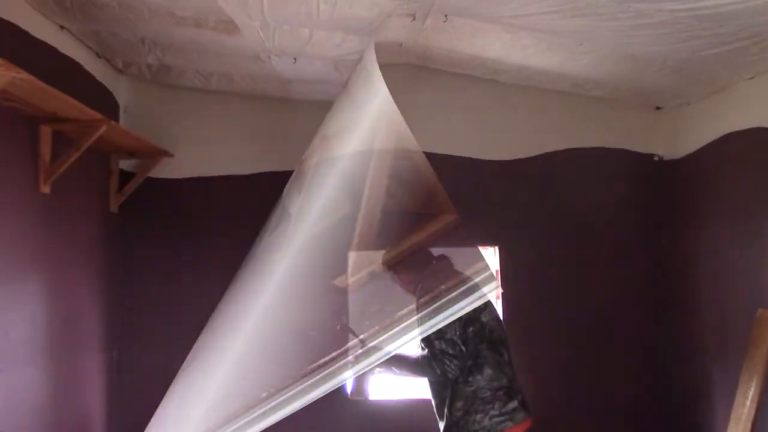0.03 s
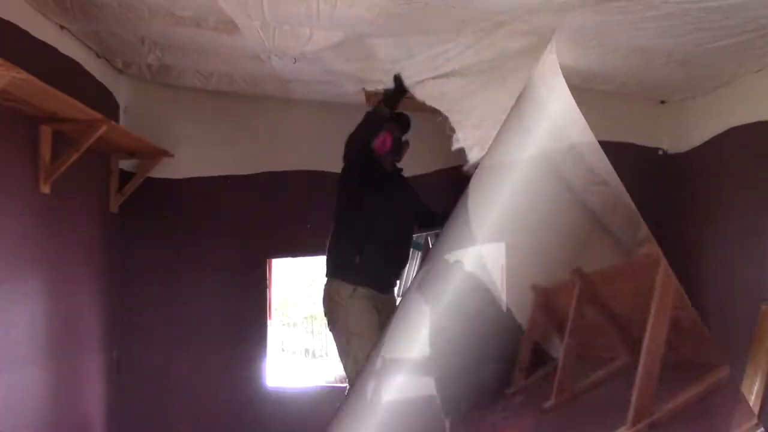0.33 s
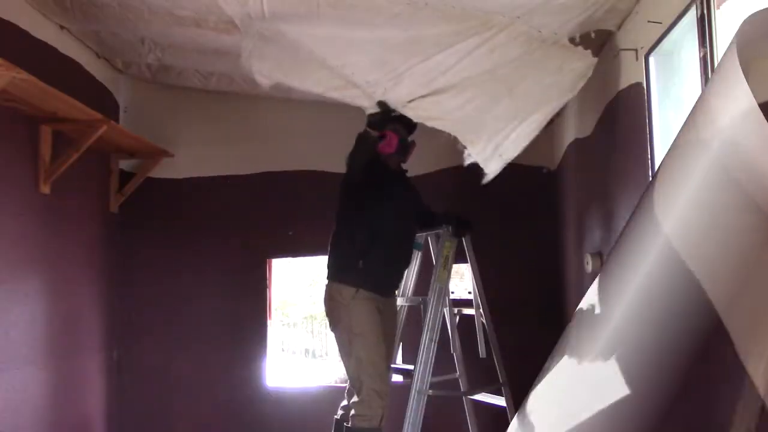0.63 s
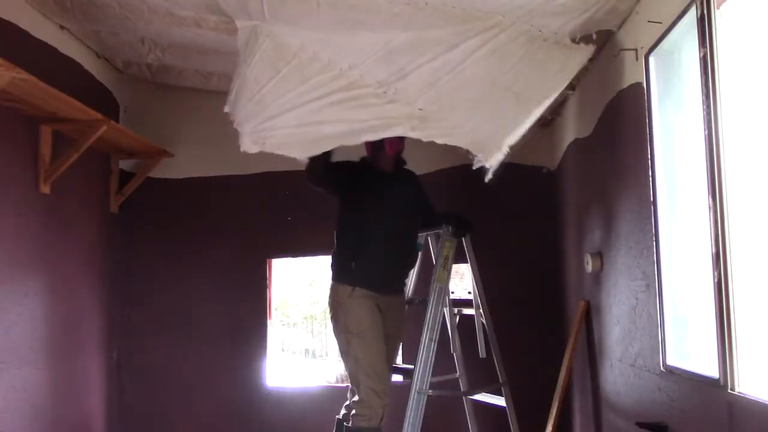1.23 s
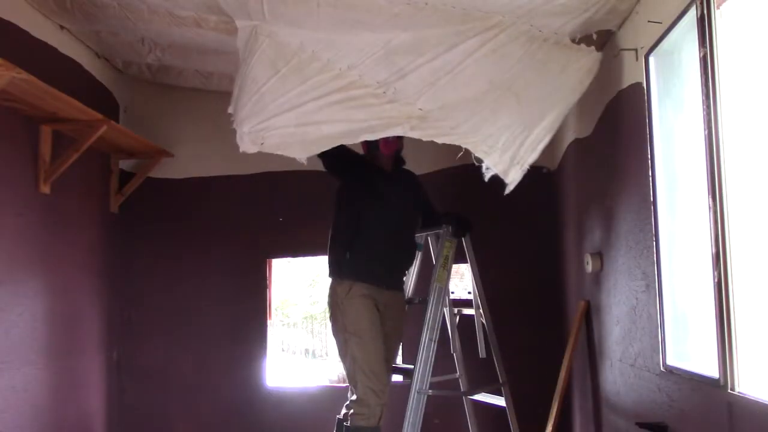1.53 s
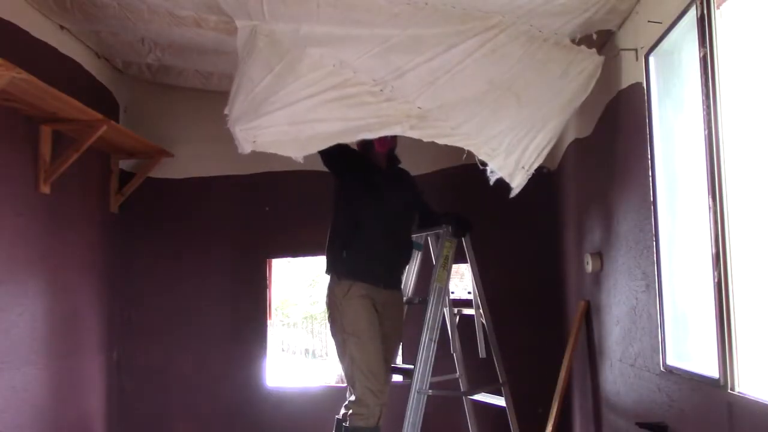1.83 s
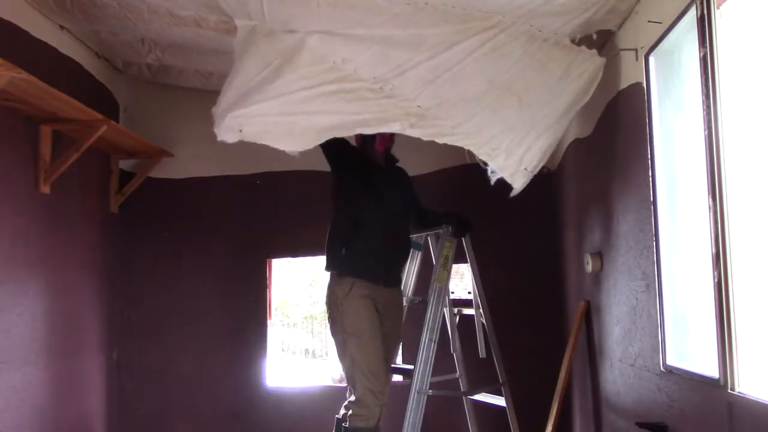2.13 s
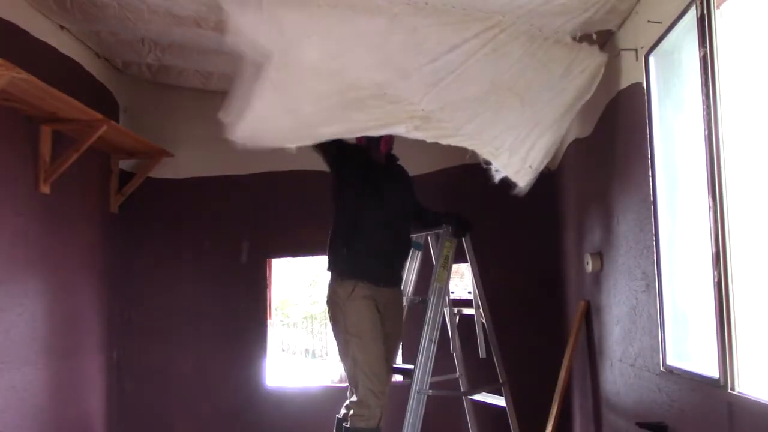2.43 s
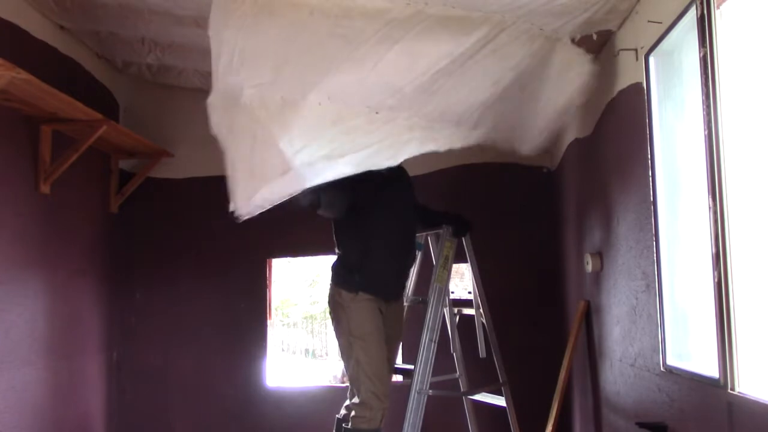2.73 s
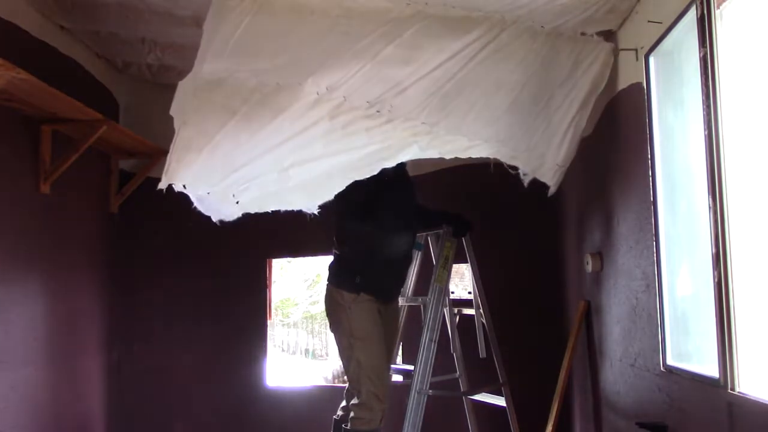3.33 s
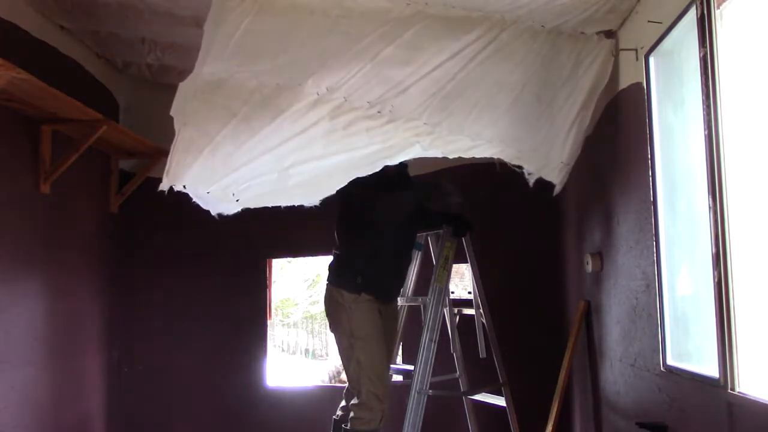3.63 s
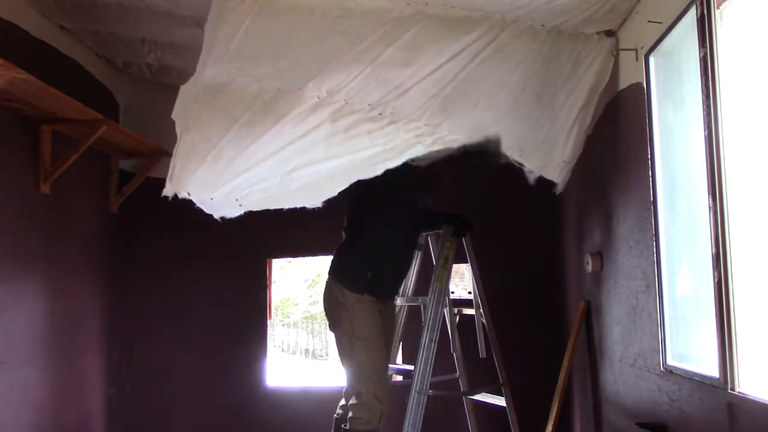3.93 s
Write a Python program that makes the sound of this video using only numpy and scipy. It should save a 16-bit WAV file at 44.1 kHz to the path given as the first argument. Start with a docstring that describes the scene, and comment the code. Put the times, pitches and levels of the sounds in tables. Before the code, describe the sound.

Crackling and short rips of a big stapled sheet being torn down indoors.

```python
"""Crackling and short rips: a large stapled sheet is being pulled off the ceiling of a bare room.
Creases buckle, fibres snap and the sheet pops off its staples. In one fast tear the threads snap
so evenly that they screech, while the taut part groans and the loose part flutters.
The worker knocks dully on the stepladder and scuffs once, over a faint steady whirr.
All is heard in mono from a few metres away."""
import sys
import numpy as np
from scipy import signal
from scipy.fft import rfft, irfft
from scipy.io import wavfile

SR = 44100
rng = np.random.default_rng(int(sys.argv[2]) if len(sys.argv) > 2 else 0)


def log_audio(samples):
    """Write samples as a 16-bit WAV file to the path given in sys.argv[1]."""
    # one column per channel
    frames = np.atleast_2d(samples).T
    # limit to full scale, then quantise
    limited = np.clip(frames, -1, 1)
    pcm = np.round(limited * 32767).astype(np.int16)
    wavfile.write(sys.argv[1], SR, pcm)


N = 176400
T = np.arange(N) / SR


def from_db(db):
    """Decibels to gain."""
    return 10 ** (np.asarray(db) / 20)


def unit_rms(x):
    """Scale to an rms of 1."""
    return x / np.sqrt(np.mean(x ** 2) + 1e-20)


def at_hz(points, hz):
    """Read a curve on a log-frequency axis."""
    freqs, values = np.transpose(points)
    return np.interp(np.log(hz + 1e-3), np.log(freqs), values)


def fader(times, db):
    """Gain riding a dB curve, silent outside it."""
    return from_db(np.interp(T, times, db, left=-120, right=-120))


def decay(start, decay_s):
    """Envelope with a hard attack and an exponential tail."""
    return (T >= start) * np.exp(-np.clip((T - start) / decay_s, 0, 20))


def filtered(x, kind, hz, order=2):
    """Butterworth low-pass or high-pass."""
    return signal.sosfilt(signal.butter(order, hz, kind, fs=SR, output="sos"), x + 1e-18)


def coloured(x, eq):
    """Apply an EQ curve at minimum phase, so clicks keep their attack; the result has an rms of 1."""
    gain = from_db(at_hz(eq, np.fft.rfftfreq(N, 1 / SR)))
    cepstrum = irfft(np.log(gain), N)
    cepstrum[1:N // 2] *= 2
    cepstrum[N // 2 + 1:] = 0
    return unit_rms(irfft(rfft(x) * np.exp(rfft(cepstrum)), N))


def drift(rate_hz):
    """Smooth random wander with an rms of 1."""
    return unit_rms(filtered(rng.standard_normal(N), "low", rate_hz))


def clicks(per_s, spread_db, rows=1):
    """Rows of random clicks of uneven size."""
    sizes = from_db(spread_db * np.minimum(rng.exponential(1, (rows, N)), 4))
    return sizes * rng.choice([-1, 1], (rows, N)) * (rng.random((rows, N)) < per_s / SR)


def ring(x, hz, t60):
    """Resonator: a unit click sets a sine of height 1 ringing."""
    radius, angle = from_db(-60 / (t60 * SR)), 2 * np.pi * hz / SR
    return signal.lfilter([0, np.sin(angle)], [1, -2 * radius * np.cos(angle), radius ** 2], x + 1e-18)


# Reverb time of the bare room (frequency [Hz], T60 [s])
REVERB_TIMES = [(100, 0.48), (1500, 0.52), (4000, 0.21), (8000, 0.36), (16000, 0.22)]


def room(places, direct_share=0.5, predelay_s=0.0024):
    """Each row is a place in the room with its own dense tail, which dies sooner in the treble."""
    places = np.atleast_2d(places)
    t, hz = T[:SR // 2], np.fft.rfftfreq(SR // 2, 1 / SR)
    white = rfft(rng.standard_normal((len(places), len(t))))
    band_edges = np.linspace(0, np.sqrt(SR / 2), num=10) ** 2
    tail = 0
    for low, high in zip(band_edges, band_edges[1:]):
        band = irfft(white * (hz >= low) * (hz < high), len(t))
        fade = from_db(-60 * t / at_hz(REVERB_TIMES, (low + high) / 2)) * (t > predelay_s)
        tail += band * fade / np.linalg.norm(fade)
    wet = signal.fftconvolve(places, tail, axes=1)[:, :N]
    heard = np.sqrt(direct_share) * places + np.sqrt(1 - direct_share) * wet
    return heard.sum(axis=0) / np.sqrt(len(places))


# Airy EQ of the background bed (frequency [Hz], level [dB])
WHIRR_EQ = [(35, -70), (60, -31), (745, 0), (1100, 3.5), (1340, -2.5), (3020, -6.5), (3320, -14),
            (11400, -28), (15800, -32)]
# Faint pitches in the bed (frequency [Hz], width [Hz], level [dB])
WHIRR_RESONANCES = [(896, 44, -63.5), (3020, 62, -58)]


def whirr():
    """A steady bed of airy noise with two narrow resonances."""
    bed = from_db(-47.5) * coloured(rng.standard_normal(N), WHIRR_EQ)
    for hz, width_hz, db in WHIRR_RESONANCES:
        t60 = np.log(1000) / (np.pi * width_hz)
        bed += from_db(db) * unit_rms(ring(rng.standard_normal(N), hz, t60))
    return bed


# Mid-heavy EQ of the rub (frequency [Hz], level [dB])
SCUFF_EQ = [(200, -34), (600, 6), (2200, 2), (5000, -11), (12000, -43)]


def scuff():
    """One short, dull, grainy rub as the worker shifts."""
    grit = coloured(clicks(per_s=3200, spread_db=2.4), SCUFF_EQ)
    return from_db(-32) * decay(start=3.662, decay_s=0.059) * grit


# Knock cues; a lower cut-off is a softer hit (time [s], strength [dB], cut-off [Hz])
KNOCKS = [(0.01, -28.5, 930), (0.094, -36, 300), (1.781, -35, 500), (3.206, -21, 470), (3.229, -33, 700),
          (3.249, -43, 800), (3.78, -48, 900)]
# Boxy EQ of the thud (frequency [Hz], level [dB])
THUD_EQ = [(50, -47), (120, -32), (180, -19), (250, 2), (550, -2.5), (800, -6.5), (2000, -34), (8000, -73)]
# Low ringing modes that each knock sets off (frequency [Hz], relative level [dB], T60 [s])
KNOCK_MODES = [(239, -1, 0.18), (255, 1.5, 0.16), (318, -5, 0.27), (385, -3, 0.26), (522, 0, 0.33),
               (574, 1, 0.26)]


def ladder_thumps(thud_trim_db=5.5, ring_trim_db=-2):
    """Each soft knock makes a short thud for the room to answer and sets low modes ringing."""
    push, thud = np.zeros((2, N))
    noise = coloured(rng.standard_normal(N), THUD_EQ)
    for start, db, cutoff_hz in KNOCKS:
        impulse = from_db(db) * (np.arange(N) == int(start * SR))
        burst = from_db(db + thud_trim_db) * noise * decay(start, decay_s=0.016)
        push += filtered(impulse, "low", cutoff_hz)
        thud += filtered(burst, "low", cutoff_hz)
    modes_ringing = sum(from_db(db + ring_trim_db) * ring(push, hz, t60) for hz, db, t60 in KNOCK_MODES)
    return filtered(room(thud) + modes_ringing, "high", hz=218, order=4)


# Fader ride of the flapping (time [s], level [dB])
FLUTTER_RIDE = [(1.765, -55), (1.795, -17.5), (1.825, -21.5), (1.86, -26), (1.92, -64), (2.499, -47),
                (2.59, -21.5), (2.635, -29.5), (2.68, -24.5), (2.759, -25.5), (2.839, -21.5), (2.9, -57),
                (3.17, -29.5)]
# Muffled EQ of the flaps (frequency [Hz], level [dB])
FLUTTER_EQ = [(60, -33), (150, -18), (230, -3), (400, 4), (1000, -4.5), (1650, -1.5), (3500, -49)]


def flutter():
    """The freed sheet drums with quick, dull flaps."""
    flaps = coloured(clicks(per_s=400, spread_db=2.7), FLUTTER_EQ)
    return fader(*np.transpose(FLUTTER_RIDE)) * flaps


# Groan cues under the fast tear (centre time [s], half length [s], pitch [Hz], level [dB])
GROAN_CUES = [(2.593, .018, 769, -26.5), (2.689, 0.017, 740, -22), (2.738, 0.023, 597, -30),
              (2.753, .045, 407, -24.5), (2.8, .1, 229.7, -34.5)]


def groans(sag_per_s=0.35, wobble=0.016, flicker_db=1):
    """The taut sheet gives short, rough tones that swell and sag in pitch as the tension lets go."""
    out = 0
    for centre, half_length, hz, db in GROAN_CUES:
        since = np.clip(T - centre, -half_length, half_length)
        pitch = hz * (1 - sag_per_s * since + wobble * drift(110))
        tone = np.sin(2 * np.pi * np.cumsum(pitch) / SR)
        flicker = from_db(flicker_db * drift(90))
        swell = np.cos(np.pi / 2 * since / half_length)
        out += from_db(db) * swell * unit_rms(tone * flicker)
    return out


# Pitch and fader ride of the screech (time [s], thread snap rate [Hz], level [dB])
SCREECH_RIDE = [(2.53, 5500, -22), (2.57, 5400, -19), (2.666, 5250, -21.5), (2.679, 5170, -14.5),
                (2.733, 5260, -13), (2.78, 5130, -16.5), (2.84, 5200, -16), (2.877, 5190, -25.5),
                (2.895, 5170, -35)]


def fast_tear(jitter=0.028, rough_db=4.5, weave_hz=798, weave_depth=0.52):
    """Threads snap one after another at a nearly even rate, which makes a rough screech."""
    times, snap_hz, db = np.transpose(SCREECH_RIDE)
    speed = 1 + jitter * drift(178)
    phase = 2 * np.pi * np.cumsum(np.interp(T, times, snap_hz) * speed) / SR
    tone = np.sin(phase) + from_db(-14) * np.sin(1.93 * phase)  # upper partial just under the octave
    # The weave repeats every few threads and beats in the tear, adding side tones.
    weave = 1 + weave_depth * np.sin(2 * np.pi * weave_hz * np.cumsum(speed) / SR)
    roughness = from_db(rough_db * drift(370))
    return fader(times, db) * unit_rms(tone * weave * roughness)


# Staple pop cues (time [s], level [dB])
POP_CUES = [(1.091, -16), (1.72, -19), (1.865, -23), (1.936, -29), (1.97, -17), (2.084, -17.5),
            (2.333, -15.5), (2.411, -26), (2.897, -14), (2.941, -13.5), (3.007, -15.5), (3.46, -48),
            (3.937, -13.5)]
# Bright EQ of the sheet giving way, for pops and rips alike (frequency [Hz], level [dB])
RIP_EQ = [(30, -16.5), (70, -31), (140, -26), (400, -9), (1500, -12), (4500, 3.5), (7500, 3.5),
          (10500, 4.5), (13000, -2), (16000, -19)]
CRISP_LOW_CUT_HZ = 6600


def staple_pops():
    """The sheet tears off each staple with a few milliseconds of very bright noise."""
    noise = coloured(rng.standard_normal(N), RIP_EQ)
    crisp = unit_rms(filtered(noise, "high", CRISP_LOW_CUT_HZ))
    return crisp * sum(from_db(db) * decay(start, decay_s=0.0039) for start, db in POP_CUES)


# Fader rides of the crackle over three pulls, before trim (time [s], body [dB], treble [dB])
PULL_RIDE = [(0, -16.5, -22), (0.22, -18.5, -21.5), (0.43, -20, -18), (0.56, -17, -20), (0.72, -18, -18),
             (0.9, -13.5, -24), (1.03, -19.5, -28), (1.12, -16, -34), (1.23, -21.5, -46),
             (1.31, -46.5, -45), (1.565, -47, -62), (1.58, -22.5, -40), (1.76, -16, -30.5),
             (1.84, -26, -44), (1.89, -19.5, -33), (2.2, -15, -24), (2.35, -17.5, -30.5),
             (2.42, -18.5, -18.5), (2.53, -18.5, -17), (2.65, -15.5, -25), (2.72, -20.5, -30),
             (2.8, -17, -29.5), (2.91, -18, -34), (2.98, -13, -39), (3.08, -23.5, -66), (3.16, -37, -56),
             (3.25, -44.5, -59), (3.85, -62, -59), (3.9, -33.5, -45), (3.92, -22, -34), (4, -9.5, -12.5)]
# Rip cues where the sheet gives way, before trim (time [s], body [dB], treble [dB])
RIP_CUES = [(0.009, -21, -18.5), (0.106, -13, -13), (0.333, -2, -13.5), (0.376, -3, -11.5),
            (0.612, -0.5, -16), (0.648, -5.5, -13), (0.865, -3, -22), (0.91, -6, -23.5), (1.07, -0.5, -14),
            (1.097, -7, -18), (1.218, -10, -32), (1.572, -7.5, -27), (1.645, -5, -21.5), (1.73, -3, -20.5),
            (1.866, -6, -29), (1.928, -4, -24), (1.965, -7, -27), (2.041, -4, -21), (2.17, -0.5, -19),
            (2.225, -4, -17), (2.379, -2.5, -14), (2.403, -4.5, -11.5), (2.47, -22, -10.5),
            (2.66, -2.5, -20), (2.943, -3, -20), (3.004, -3.5, -34), (3.272, -39, -39), (3.907, -13, -24.5),
            (3.937, -20, -20)]
# EQ of buckling creases, the body of the crackle (frequency [Hz], level [dB])
CREASE_EQ = [(60, -63), (130, -40.5), (250, -19.5), (500, -6.5), (900, 1), (1500, 3), (2700, 2.5),
             (4000, -3), (6000, -6.5), (8000, -16.5), (16000, -60)]
# EQ of snapping fibres, its treble (frequency [Hz], level [dB])
SNAP_EQ = [(200, -58), (500, -16), (1500, -9), (3000, 3), (4500, 1.5), (6200, 2), (7800, -2), (10000, -4),
           (13000, -14.5), (16000, -26)]


def pulled_sheet(rip_attack_s=0.0015, rip_hold_s=0.017, rip_release_s=0.0049):
    """Creases buckle and fibres snap at five places under the pull; each rip is a brighter burst."""
    times, body_db, treble_db = np.transpose(PULL_RIDE)
    crease_power = fader(times, body_db - 1.5) ** 2
    snap_power = fader(times, treble_db + 1.5) ** 2
    rip_power = 0
    for start, rip_body_db, rip_treble_db in RIP_CUES:
        attack = np.clip((T - start) / rip_attack_s + 1, 0, 1)
        release = np.exp(-np.clip((T - start - rip_hold_s) / rip_release_s, 0, 20))
        burst = attack * release
        crease_power += (burst * from_db(rip_body_db - 10.5)) ** 2
        rip_power += (burst * from_db(rip_treble_db - 2)) ** 2
    creases = np.sqrt(crease_power) * coloured(clicks(per_s=1200, spread_db=2.5, rows=5), CREASE_EQ)
    snaps = np.sqrt(snap_power) * coloured(clicks(per_s=300, spread_db=4, rows=5), SNAP_EQ)
    rips = np.sqrt(rip_power) * coloured(clicks(per_s=800, spread_db=4.6, rows=5), RIP_EQ)
    # Lone crisp ticks from the nearest edge ride just under the treble.
    ticks = unit_rms(filtered(clicks(per_s=44, spread_db=4.2), "high", CRISP_LOW_CUT_HZ))
    tick_gain = from_db(-14) * np.sqrt(snap_power + rip_power)
    return room(creases + snaps + rips) + room(tick_gain * ticks)


def scene():
    """Mix the sheet, the worker and the background bed, alike in both channels."""
    crackle = pulled_sheet()
    accents = room(fast_tear() + flutter() + staple_pops() + scuff())
    mono = crackle + accents + groans() + ladder_thumps() + whirr()
    return np.array([mono, mono])


def record(dry, ceiling=0.85, cutoff_hz=15900):
    """A soft clip rounds the loud peaks and a steep low-pass takes off the very top."""
    rounded = dry / (1 + (dry / ceiling) ** 4) ** (1 / 4)
    return signal.sosfilt(signal.ellip(12, 0.1, 80, cutoff_hz, fs=SR, output="sos"), rounded)


dry = scene()
out = record(dry)
log_audio(out)
```